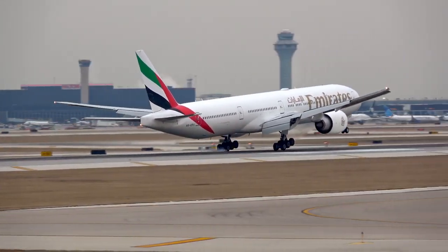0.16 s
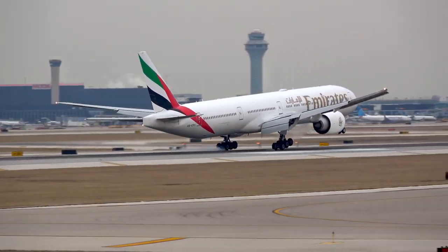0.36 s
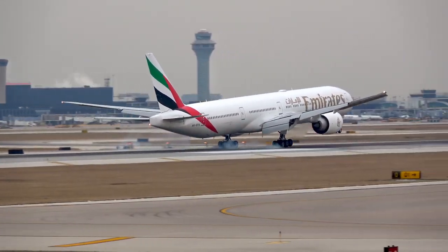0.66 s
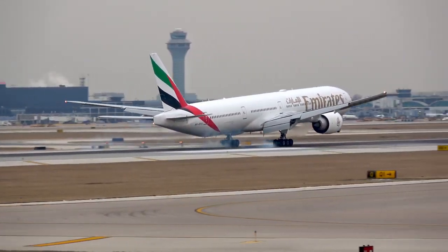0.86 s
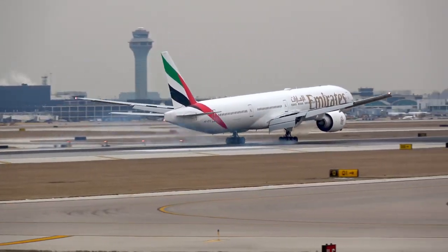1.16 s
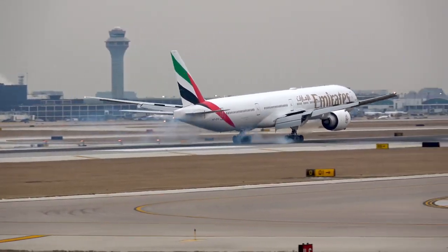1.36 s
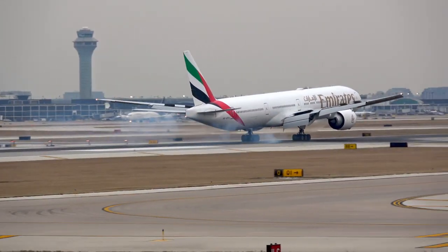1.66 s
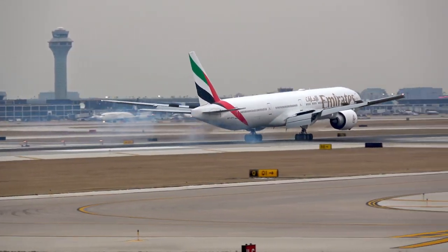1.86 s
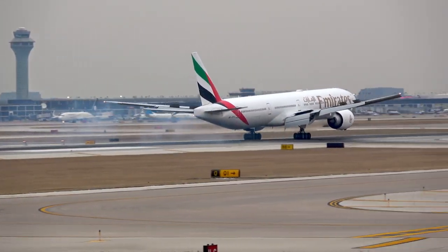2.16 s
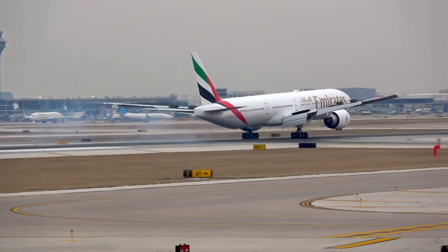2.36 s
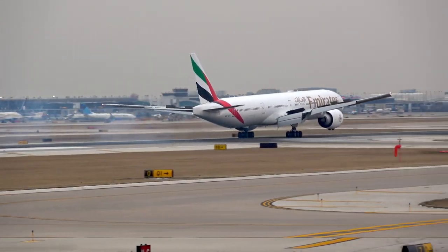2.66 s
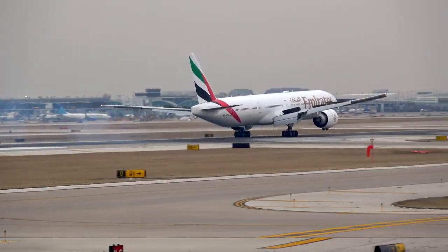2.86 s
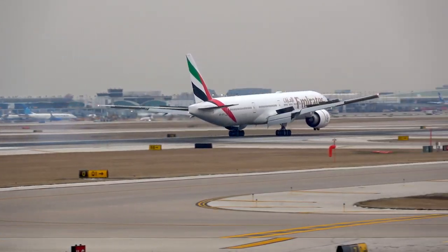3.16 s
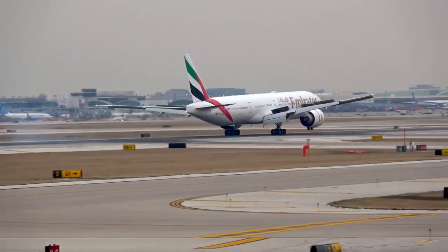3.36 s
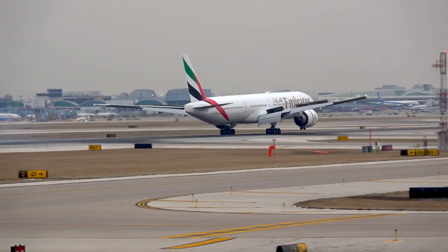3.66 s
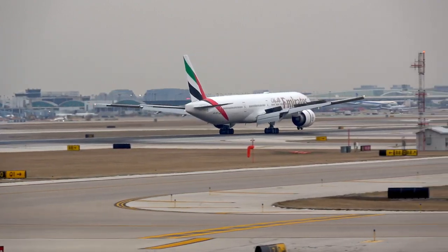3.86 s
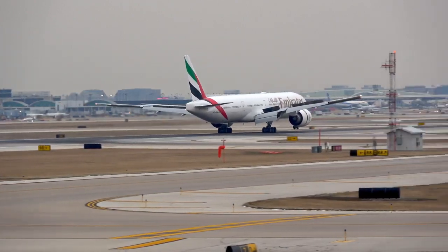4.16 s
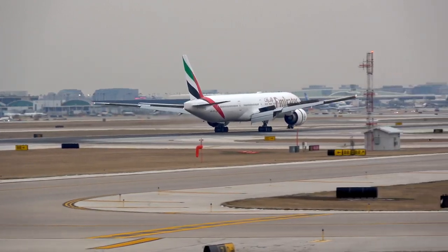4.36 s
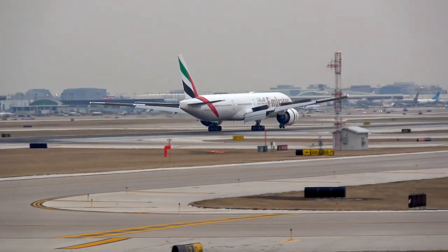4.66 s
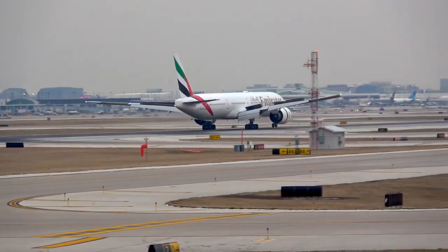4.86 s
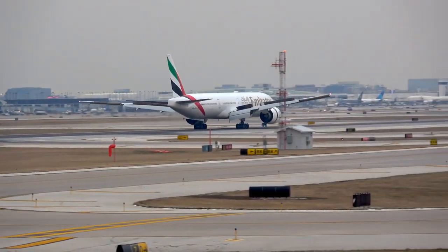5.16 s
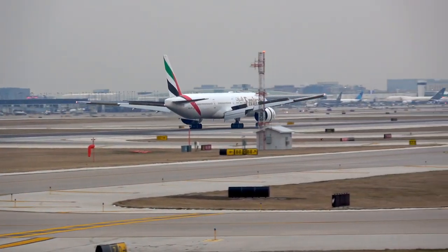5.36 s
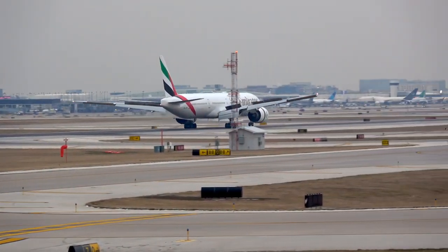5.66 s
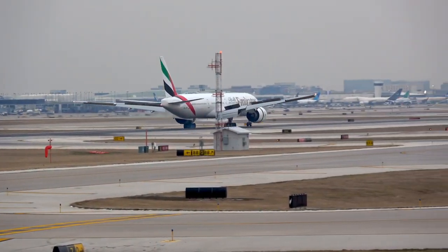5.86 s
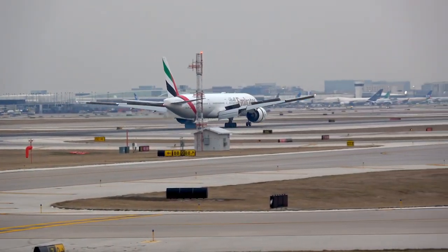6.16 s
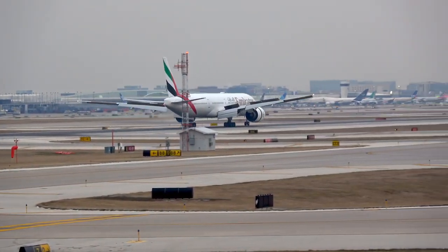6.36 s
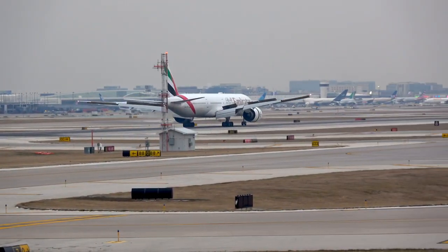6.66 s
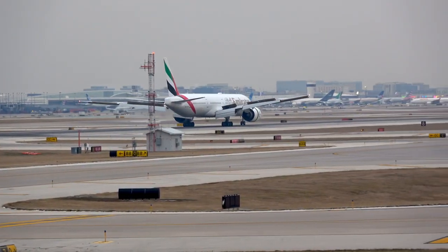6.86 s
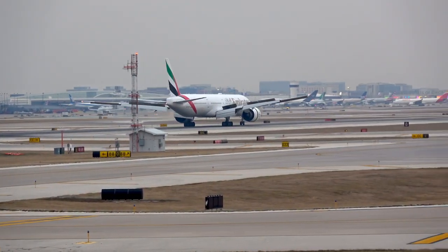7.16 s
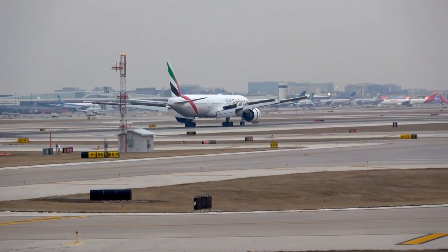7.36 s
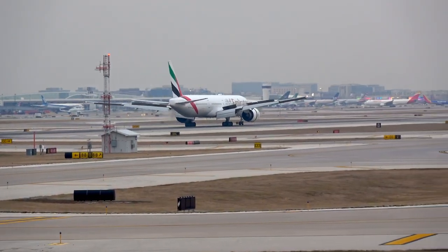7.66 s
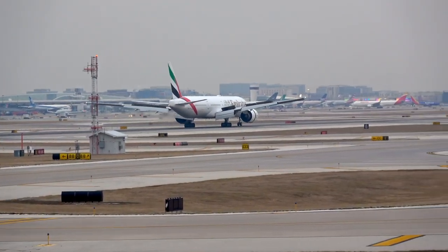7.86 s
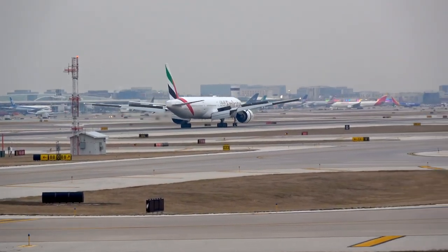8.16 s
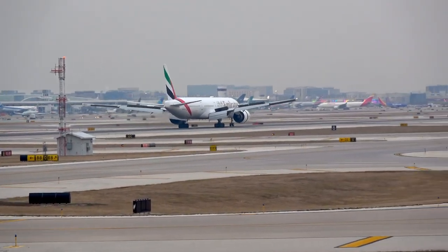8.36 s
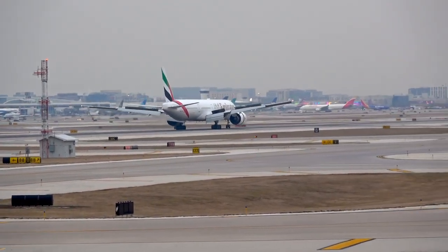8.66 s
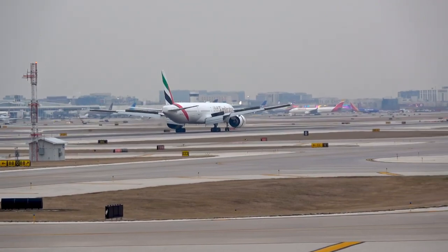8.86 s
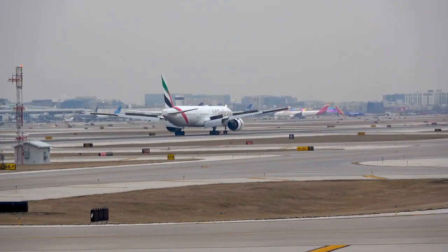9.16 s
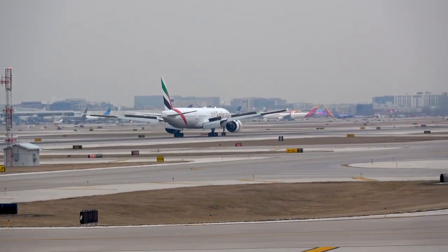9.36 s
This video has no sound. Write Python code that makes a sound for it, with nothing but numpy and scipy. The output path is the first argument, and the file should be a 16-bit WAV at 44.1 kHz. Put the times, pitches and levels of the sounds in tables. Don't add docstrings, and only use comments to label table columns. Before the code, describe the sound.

A large jet rolls out after landing, its low rumble swelling into a broad reverse-thrust roar while nearby camera shutters clack and plastic ticks.

```python
import sys
import numpy as np
from scipy import signal
from scipy.fft import rfft, irfft, next_fast_len
from scipy.io import wavfile
from scipy.ndimage import uniform_filter1d, map_coordinates

SR = 44100
rng = np.random.default_rng(int(sys.argv[2]) if len(sys.argv) > 2 else 0)


def wrap_up_sound(samples):
    columns = np.atleast_2d(samples).T
    tamed = np.clip(columns, -1, 1)
    steps = np.round(tamed * 32767).astype(np.int16)
    wavfile.write(sys.argv[1], SR, steps)


def volts_from_db(level):
    exponent = np.asarray(level, float) / 20
    return 10 ** exponent


N = 420273
FRAME_S = .2575


def unit(x):
    return x / np.sqrt(np.mean(np.abs(x) ** 2) + 1e-20)


def curves(rows):
    s, *cols = np.transpose(rows)
    return [np.interp(np.arange(N) / SR, s, c) for c in cols]


def gate(start, end, fade):
    t = np.arange(N) / SR
    return np.clip(np.minimum(t - start, end - t) / fade + 1, 0, 1)


def spool(mid_s, rise_s):
    return 1 / (1 + np.exp((mid_s - np.arange(N) / SR) / rise_s))


def wobble(rate):
    knots = rng.standard_normal(int(N * rate / SR) + 4)
    return map_coordinates(knots, [np.arange(N) * rate / SR])


def filtered(x, response):
    m = next_fast_len(N + 8192)
    return irfft(rfft(x, m) * response(np.fft.rfftfreq(m, 1 / SR)), m)[:N]


def rush(spectrum, patchy_db):
    z = signal.stft(rng.standard_normal(N), nperseg=512)[2]
    across_hz = uniform_filter1d(rng.standard_normal(z.shape), size=5, axis=0)
    patches = unit(uniform_filter1d(across_hz, size=16, axis=1))
    noise = signal.istft(z * volts_from_db(patchy_db * patches), nperseg=512)[1][:N]
    hz, db = np.transpose(spectrum)
    return unit(filtered(noise, lambda f: volts_from_db(np.interp(np.log(f + 1), np.log(hz), db, -120, -120))))


def tone(hz, db, flutter_db, drift_hz):
    level = volts_from_db(db + 1 + flutter_db * wobble(15))
    return level * np.sin(2 * np.pi * np.cumsum(hz + drift_hz * wobble(25)) / SR)


def struck(times, levels_db, modes):
    sizes = volts_from_db(levels_db) * rng.choice([-1, 1], len(times))
    places = np.clip(np.round(np.multiply(times, SR)).astype(int), 0, N - 1)
    blows = np.bincount(places, sizes, N)

    def body(f):
        return sum(volts_from_db(db) * (1j * f * w / (c * c - f * f + 1j * f * w)) ** 2 for c, w, db in modes)

    peak = np.abs(irfft(body(np.fft.rfftfreq(2048, 1 / SR)))).max()
    return filtered(blows, body) / peak


def jets():
    # (time [s], thrust as roar level [dB], how well the air carries mid and treble [dB])
    engines = [(0, -24.5, 1.5), (.7, -26.5, 2), (1.3, -25.5, 1.5), (2, -27, 0.5), (2.7, -25.5, 1.5),
               (3.4, -26.5, 0), (4, -24, 0), (4.7, -21, -.5), (5.4, -22, 1), (5.9, -19, 2), (6.3, -21, 2),
               (6.9, -18, 0), (7.15, -17, 1.5), (7.5, -17, 2.5), (7.75, -20, 0), (8.6, -17, -1),
               (9.1, -15.5, -3), (9.53, -16.5, 0)]
    # (time [s], half length [s], level [dB])
    breezes = [
        (4, .25, 2),
        (5.3, .7, 2.5),
        (6.2, 0.24, -3),
        (6.65, 0.3, 1.5),
        (9.05, .3, 4),
    ]
    # (frequency [Hz], level [dB per Hz])
    rumble_colour = [(11, -47), (18, -20.5), (43, 0.5), (65, 5.5), (100, 1.5), (146, -17), (220, -19.5),
                     (290, -43), (480, -120)]
    roar_colour = [(76, -41.5), (130, -4.5), (156, -14.5), (232, -2.5), (389, 0.5), (473, 0), (599, -7),
                   (800, -20), (1040, -28), (1760, -120)]
    core_colour = [(320, -38), (550, -10), (700, -7), (900, -6.5), (1100, -8), (1300, -14), (1600, -24.5),
                   (2200, -53), (4000, -120)]
    fan_colour = [(700, -51), (1150, -5), (1400, 2), (1700, -2), (2000, -8), (2400, -11), (2700, -11.5),
                  (3100, -24.5), (3500, -37.5), (4200, -46.5), (6000, -120)]
    hiss_colour = [(1800, -38), (2600, 0.5), (3100, 5), (3500, 0.5), (3900, 1.5), (4300, -4.5),
                   (4800, -11.5), (6000, -28.5), (9000, -120)]
    fizz_colour = [(3500, -41.5), (4600, -1.5), (5300, 1), (5900, 1), (6600, -5), (7600, -10.5),
                   (9000, -16), (11000, -22), (15000, -120)]

    roar_db, clear_db = curves(engines)
    idle_db = -26.5
    thrust_db = roar_db - idle_db
    near_db = 4 * np.exp(-np.arange(N) / SR / 0.8)
    breeze_db = sum(db * gate(s, s, half) for s, half, db in breezes)
    air = wobble(6.4)

    doors_db = 3.5 * spool(mid_s=3, rise_s=.15)
    rumble_db = -26 + 0.54 * thrust_db + doors_db
    core_db = -32.5 + 1.098 * thrust_db + clear_db + 0.23 * air
    fan_db = -41.5 + 0.52 * thrust_db + .8 * clear_db + near_db + 0.27 * breeze_db + 0.18 * air
    hiss_db = -79 + 26.5 * spool(mid_s=3.66, rise_s=.6)
    hiss_db = hiss_db + breeze_db + .2 * clear_db + 2.2 * near_db + 0.24 * air
    fizz_db = -86 + 21.5 * spool(mid_s=5.7, rise_s=.95) + .7 * breeze_db + .7 * air

    rumble = volts_from_db(rumble_db) * rush(rumble_colour, patchy_db=-0.16)
    roar = volts_from_db(roar_db + 0.09) * rush(roar_colour, patchy_db=-0.83)
    core = volts_from_db(core_db) * rush(core_colour, patchy_db=0.88)
    fan = volts_from_db(fan_db) * rush(fan_colour, patchy_db=0.66)
    hiss = volts_from_db(hiss_db) * rush(hiss_colour, patchy_db=1.9)
    fizz = volts_from_db(fizz_db) * rush(fizz_colour, patchy_db=1.4)
    return rumble + roar + core + fan + hiss + fizz


def duct_howl():
    # (time [s], frequency [Hz], level [dB])
    duct = [(2.2, 1257, -45), (2.7, 1254, -40), (3.3, 1249, -34), (4.4, 1260, -30), (5, 1265, -32.5),
            (6.3, 1256, -30.5), (7, 1222, -29), (8.3, 1209, -33), (9.53, 1200, -30)]
    # (time [s], half length [s], depth [dB])
    dropouts = [
        (3.947, 0.36, 8.5),
        (6.647, 0.13, 10),
        (6.928, 0.055, 9),
    ]
    width_hz = 52
    hz, db = curves(duct)
    db = db - sum(depth_db * gate(s, s, half) for s, half, depth_db in dropouts)
    slow = [filtered(rng.standard_normal(N), lambda f: 1 / (1 + (f / width_hz) ** 2)) for _ in range(2)]
    band = np.real((slow[0] + 1j * slow[1]) * np.exp(2j * np.pi * np.cumsum(hz) / SR))
    return gate(duct[0][0], N / SR, .4) * volts_from_db(db - 0.5 + 1.5 * wobble(6)) * unit(band)


def cavity_whistle():
    # (time [s], frequency [Hz], level [dB])
    cavity = [(0, 310.5, -30), (.42, 304, -28), (.55, 302.3, -37), (.68, 300.3, -29), (1.1, 294, -24),
              (1.32, 291, -24), (1.42, 289.6, -34), (2, 283, -33), (2.4, 279, -41)]
    hz, first_db = curves(cavity)
    octave_db = -32 - 12 * np.maximum(np.arange(N) / SR - 1.3, 0)
    first = tone(hz, first_db, flutter_db=2.6, drift_hz=1)
    octave = tone(2 * hz, octave_db, flutter_db=3, drift_hz=1.6)
    return gate(0, cavity[-1][0], .3) * (first + octave)


def shutter(shots, cycle, chatter_db, chatter_s):
    # (frequency [Hz], width [Hz], level [dB])
    light_body = [(7300, 700, -6), (9000, 550, 0), (10600, 800, -4), (12400, 1400, -13)]
    heavy_body = [(4100, 1300, 0), (5400, 2000, -5), (8300, 2200, -10), (11000, 3500, -13)]
    after, db, bright = np.transpose(cycle)
    start, shot_db = np.transpose(shots)
    clacks = (start[:, None] + after).ravel()
    clack_db = (shot_db[:, None] + db).ravel() + rng.normal(0, 1.2, len(clacks))
    lag = chatter_s * rng.exponential(1, (len(clacks), 24))
    rattle_db = clack_db[:, None] + chatter_db + rng.normal(0, 3, lag.shape)
    times = np.column_stack([clacks, clacks[:, None] + lag]).ravel()
    levels = np.column_stack([clack_db, rattle_db]).ravel()
    share = np.repeat(np.tile(bright, len(start)), repeats=25)
    thin = struck(times, levels + 20 * np.log10(share), light_body)
    thick = struck(times, levels + 20 * np.log10(1 - share), heavy_body)
    return thin + thick


def light_camera():
    # (time [s], level [dB])
    shots = [(.561 + k * FRAME_S, 4.5) for k in range(2)]
    # (time after release [s], level [dB], brightness [0-1])
    cycle = [(0, -58, .95), (.034, -68, .95), (.054, -66, .95), (.079, -57, .9), (.093, -58, .85),
             (.118, -60, .85), (.126, -65, .9), (.135, -55, .9), (.139, -60, .9), (.148, -63, .8),
             (.159, -54, .9)]
    return shutter(shots, cycle, chatter_db=-18, chatter_s=.007)


def heavy_camera():
    # (time [s], level [dB])
    shots = [(1.1935 + k * FRAME_S, 5.5 + .4 * k) for k in range(5)]
    # (time after release [s], level [dB], brightness [0-1])
    cycle = [(0, -58, .15), (.009, -63, .2), (.029, -59, .3), (.038, -62, .3), (.05, -63, .1),
             (.076, -64, .5), (.084, -61, .6), (.093, -65, .4)]
    return shutter(shots, cycle, chatter_db=-13, chatter_s=.014)


def ratchet():
    # (time [s], peak level [dB])
    ticks = [(6.0851, -51), (6.4148, -46), (7.3792, -47), (7.6955, -48), (8.0092, -44), (8.3212, -36),
             (8.632, -43), (8.9446, -41), (9.1742, -46), (9.2562, -44)]
    # (frequency [Hz], width [Hz], level [dB])
    tooth = [(5500, 1000, 0)]
    tick_s, tick_db = np.transpose(ticks)
    return struck(tick_s, tick_db + 1.0, tooth)


def housing_snaps():
    # (time [s], peak level [dB], rustle after it [dB])
    snaps = [
        (3.2694, -57, -16),
        (7.6258, -36, -22),
        (7.8445, -50, -20),
        (7.862, -55, -26),
        (8.6524, -49, -22),
    ]
    # (frequency [Hz], width [Hz], level [dB])
    shell = [(6600, 3000, -1), (10000, 2600, 0), (13000, 2400, -2)]
    s, db, rustle_db = np.transpose(snaps)
    lag = .001 + rng.gamma(2, .005, (len(s), 40))
    contact_db = (db + rustle_db).repeat(40) + rng.normal(0, 3, lag.size)
    rustle = struck((s[:, None] + lag).ravel(), contact_db, shell[1:])
    return struck(s, db, shell) + rustle


def strap_clip():
    # (time [s], peak level [dB])
    flicks = [
        (7.9392, -53),
        (9.1742, -49),
    ]
    # (frequency [Hz], width [Hz], level [dB])
    clip_body = [(8200, 1800, -3), (10300, 2200, 0)]
    return struck(*np.transpose(flicks), clip_body)


def creak():
    # (time [s], rate [slips per s], level [dB])
    slipping = [(9.028, 815, -54), (9.04, 803, -39), (9.05, 797, -40), (9.064, 780, -54)]
    rate, creak_db = curves(slipping)
    turns = np.cumsum(rate * gate(slipping[0][0], slipping[-1][0], .002)) / SR
    slips = np.diff(np.floor(turns), prepend=0)
    return filtered(slips * volts_from_db(creak_db), lambda f: (1j * f / (1j * f + 5000)) ** 3)


def cloth_brush():
    # (time [s], level [dB])
    sleeve = [(8.5, -95), (8.9, -78), (9.2, -73.5), (9.53, -80)]
    # (frequency [Hz], level [dB per Hz])
    cloth = [(5000, -30), (7000, -2), (10500, 0), (11800, -6), (13500, -30)]
    return volts_from_db(curves(sleeve)[0] + 1.5 * wobble(20)) * rush(cloth, patchy_db=2.0)


def opening_push():
    return -.11 * np.exp(-np.arange(N) / SR / .004)


def turbine_hum():
    beat_s, beat_top_s = .65, .5
    hum_db = -38 + 4 * np.cos(2 * np.pi * (np.arange(N) / SR - beat_top_s) / beat_s)
    return gate(0, 1.95, .25) * tone(745, hum_db, flutter_db=2.5, drift_hz=2)


def airfield():
    # (frequency [Hz], level [dB per Hz])
    traffic = [(40, -40.5), (90, -5), (125, 2), (170, -6), (240, -9), (500, -40.5)]
    return volts_from_db(-34.5) * rush(traffic, patchy_db=-0.8)


def microphone():
    # (time [s], level [dB])
    self_noise = [(0, -82.5), (4.8, -76.5), (7.7, -77.5), (8.7, -78.5), (9.5, -74.5)]
    # (frequency [Hz], level [dB per Hz])
    colour = [(2000, -6), (5000, 2), (8000, 2.5), (11000, 2), (13000, 1.2), (15700, -.4), (17000, -1)]
    # (frequency [Hz], level [dB])
    pilot_tone = [(14400, -92)]
    (hz, db), = pilot_tone
    pilot = volts_from_db(db + 3) * np.sin(2 * np.pi * hz * np.arange(N) / SR)
    return volts_from_db(curves(self_noise)[0] + 7.0) * rush(colour, patchy_db=0.5) + pilot


def scene():
    aircraft = jets() + duct_howl() + cavity_whistle()
    cameras = light_camera() + heavy_camera()
    plastic = ratchet() + housing_snaps() + strap_clip() + creak()
    background = cloth_brush() + opening_push() + turbine_hum() + airfield() + microphone()
    return (aircraft + cameras + plastic + background)[None]


def low_pass(x):
    return signal.sosfilt(signal.butter(12, 15760, fs=SR, output="sos"), x)


def record(dry):
    power = dry ** 2
    fast = uniform_filter1d(uniform_filter1d(power, size=900), size=900)
    slow = uniform_filter1d(power, size=9000)
    gain = np.abs(slow / fast) ** 0.086
    closing = np.clip(np.arange(N, 0, -1) / 60, 0, 1)
    return low_pass(dry * closing * gain)


dry = scene()
out = record(dry)
wrap_up_sound(out)
```